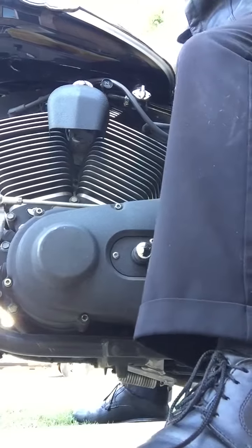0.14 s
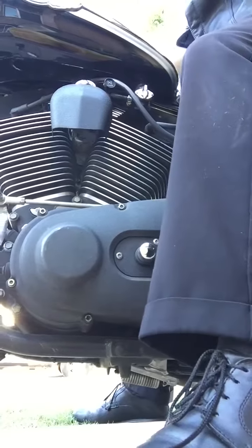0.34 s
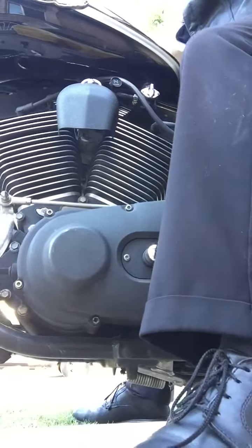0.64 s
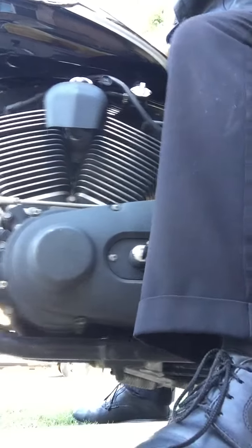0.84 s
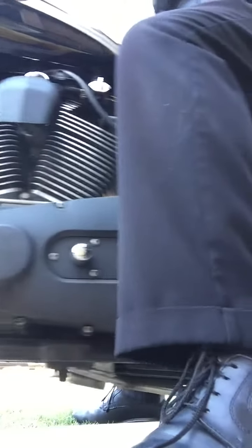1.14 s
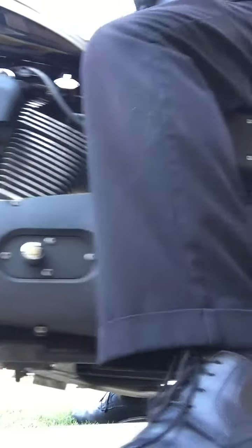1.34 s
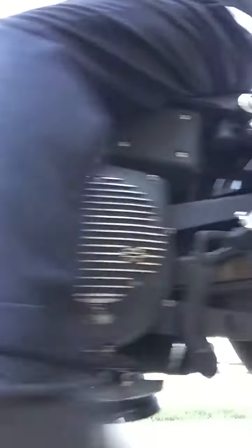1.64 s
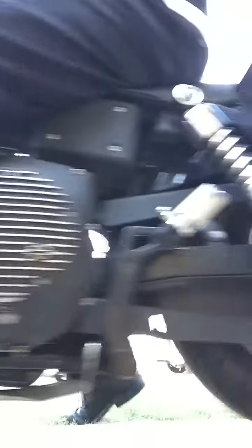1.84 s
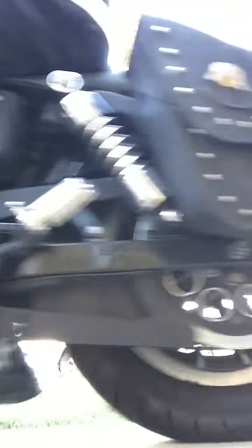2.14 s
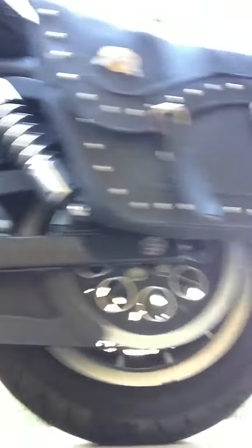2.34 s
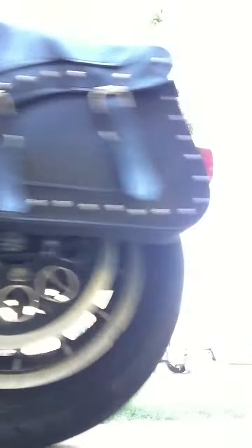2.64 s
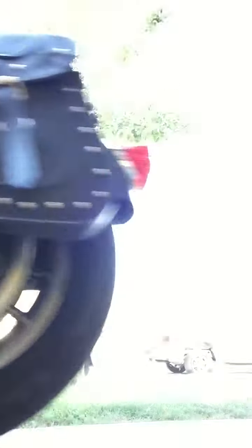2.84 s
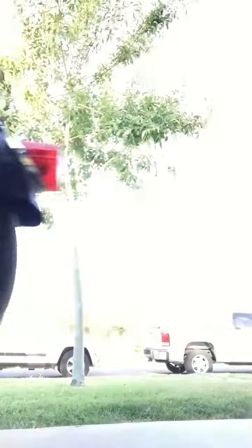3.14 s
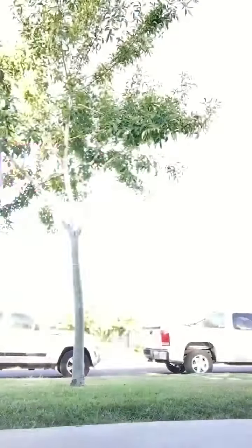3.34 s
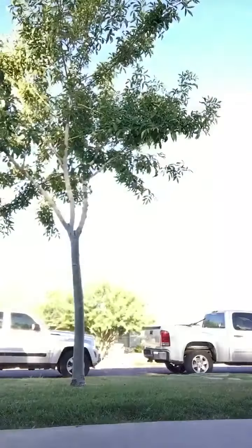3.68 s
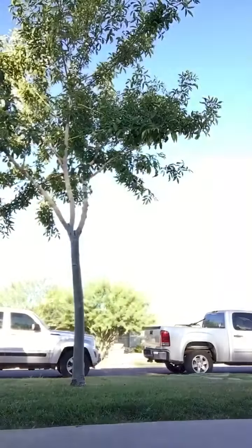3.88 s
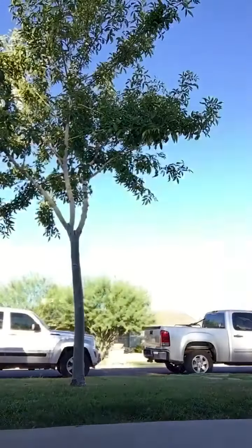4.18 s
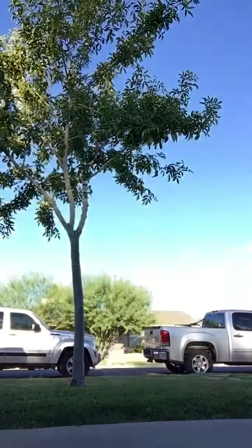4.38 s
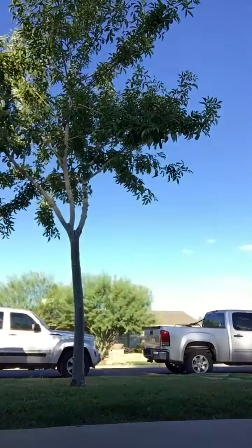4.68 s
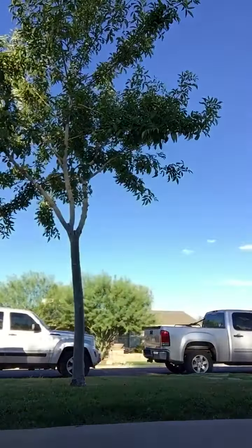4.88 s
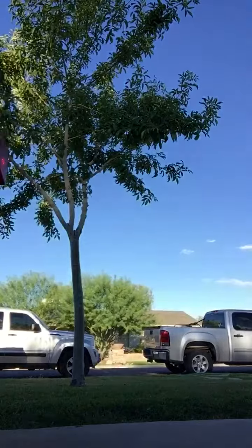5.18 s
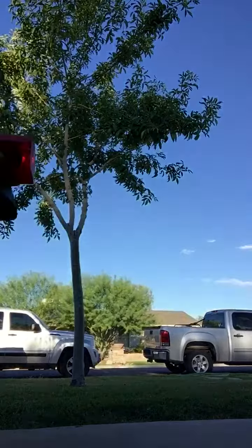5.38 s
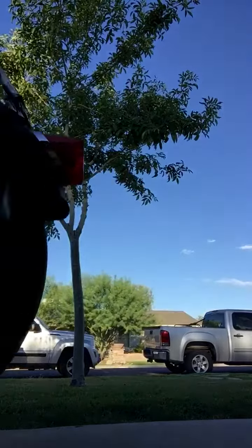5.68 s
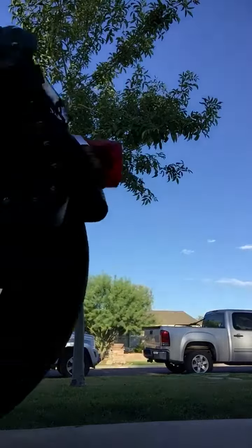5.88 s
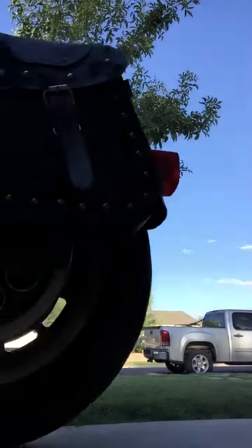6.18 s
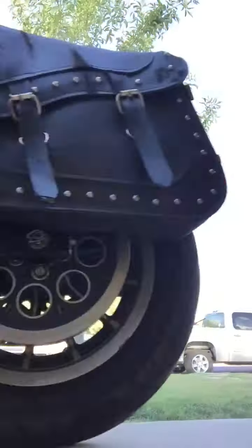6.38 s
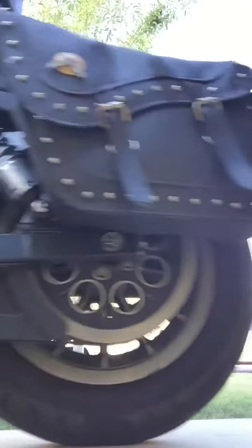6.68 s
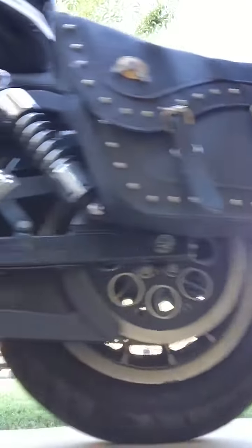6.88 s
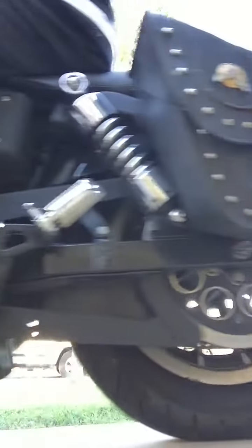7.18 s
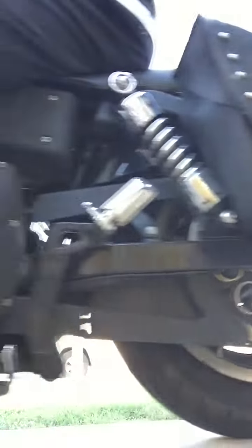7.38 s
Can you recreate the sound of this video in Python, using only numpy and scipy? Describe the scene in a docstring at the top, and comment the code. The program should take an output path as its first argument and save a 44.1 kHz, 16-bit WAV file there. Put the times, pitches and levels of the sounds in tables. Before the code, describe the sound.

For the first 0.7 seconds there is only a low street hush, a distant engine's wavering low drone and a faint switch click near 0.25. At 0.7 a steel knock starts a gritty, whining starter that labours, sinking in pitch and fading around 1.13 before grinding again; a harder clunk at 1.27 begins the second crank, higher and quicker. At 1.53 a heavy knock and sharp bangs mark the engine catching. It stumbles, booming and spitting, while a starter ratchet ticks until about 2.3. Throttle blips come at 2.6, 3.1, 4.1, 4.8, 5.1, 6.0, 6.55 and 7.1: abrupt raspy roars with deep uneven twin-cylinder pulses, then falling revs with crackling barks. The longest settling, just before 4.1, drops to a lumpy rumble; another lull precedes 6.0. Valve clatter and ringing metal sit faintly underneath. The close microphone overloads, and the sound ends still revving down around 7.5.

```python
"""On a street, close by a V-twin motorcycle: its starter grinds twice, then the engine catches and is blipped
again and again. Uneven pairs of firings excite the resonances of the exhaust pipe, rasp at its mouth, and
bark as each blip dies away, hard enough to overload the microphone. Gear meshing and ringing metal make
the starter, a ratchet ticks in its clutch, and coloured noise with one wavering tone makes the street,
where another engine idles quietly further off."""
import sys
import numpy as np
from scipy import signal
from scipy.fft import rfft, irfft, next_fast_len
from scipy.io import wavfile
from scipy.ndimage import uniform_filter1d, minimum_filter1d, map_coordinates

SR = 44100
rng = np.random.default_rng(int(sys.argv[2]) if len(sys.argv) > 2 else 0)


def store_wav(level_fs):
    """Save 16-bit WAV to argv[1]."""
    pcm = np.round(np.clip(np.atleast_2d(level_fs), -1, 1) * 32767)
    wavfile.write(sys.argv[1], SR, pcm.T.astype(np.int16))


N = 331632  # samples

# All levels are relative; each function sets the final balance.
# Engine speed as it stumbles into life: start_s, speed_cycles_per_s (four-stroke cycles)
CATCH_SPEED = [(1.53, 6.4), (1.7, 6.1), (1.9, 10.4), (2.1, 10), (2.3, 15.5), (2.5, 11.5), (2.62, 13)]
# Throttle blips: opens_s, shuts_s, first_bark_s, top_speed_cycles_per_s, coast_time_constant_s
BLIPS = [(2.6204, 2.8814, 2.9231, 30.0, .4532), (3.1059, 3.2589, 3.3027, 31.48, .5214),
         (4.0645, 4.425, 4.4512, 27.03, .4523), (4.8197, 5.0066, 5.0258, 24.26, .6034),
         (5.1441, 5.305, 5.3297, 25.78, .4321), (6.0145, 6.2948, 6.3321, 25.01, .4495),
         (6.5538, 6.7784, 6.7968, 25.49, .4591), (7.1123, 7.2502, 7.3069, 25.75, .4688)]
# Effort of each blip: opening_time_s, boom_db, crack_db (both under throttle), overrun_bark_db
EFFORT = [(0.017, -6.5, -8, -6.5), (0.085, -4, -4, -7), (0.097, -7.5, -15, -6.5), (.1, -7.5, -10, -7),
          (0.027, -8, -15.5, -4.5), (0.097, -7.5, -10, -2.5), (0.073, -7, -11, -2), (0.021, -2, -6.5, -1.5)]
# Single hard firings, as the mixture catches and near idle: start_s, crack_db, spit_db, boom_db
BANGS = [(1.5307, 1, -4, 1.5), (1.604, 2.5, -12, -2), (1.6875, -5, -24.5, -11), (1.7502, -14, -26.5, -11.5),
         (1.8332, -20, -12.5, -8), (1.8825, -23, -14.5, -2.5), (1.9337, -5.5, -18, -9),
         (2.171, -15, -17, -2.5), (2.2144, -6, -24, 1.5), (2.2437, -3.5, -23, -8), (2.582, -23, -18.5, -6),
         (4.006, -23, -47, -12.5), (4.05, -23, -33.5, -13), (5.7185, -38, -35.5, -6.5),
         (5.8911, -21.5, -43, -7), (5.9315, -21, -37, -18), (6.0432, -18.5, -24.5, -25)]
# Overrun barks, front then rear cylinder: level_db, fade_below_cycles_per_s, loss_db_per_cycle_per_s
OVERRUN = [(2, 20.99, 5.5), (-2, 26.3, 2)]
# Exhaust pipe resonances: centre_hz, width_hz, level_db
PIPE_MODES = [(64, 14.4, -6), (89, 19.7, 2), (157.6, 34, -1.5), (255.8, 43, 0.5), (342, 53, -7.5)]
# Orders of the engine cycle in the exhaust tone: order, level_db (at 17 cycles/s), rise_db_per_octave
EXHAUST_ORDERS = [(2, -16, 14), (3, -14, 4), (4, -19, 4), (5, -1, -1), (6, -11, -14), (7, -20, 14),
                  (8, -19, 17), (9, -20, 14), (10, -17, 11), (12, -19, 6), (14, -16, -3)]
# Exhaust gas noise spectrum: frequency_hz, density_db_per_hz
RASP_SPECTRUM = [(240, -26), (400, 7.5), (512, 0.5), (607, -1.5), (839, -0.5), (1250, -2.5), (1650, -8.5),
                 (2840, -11), (3160, -18), (4880, -20), (5600, -18), (9610, -22), (14100, -23.5),
                 (16000, -43)]
# Throaty gas flow spectrum: frequency_hz, density_db_per_hz
BELLOW_SPECTRUM = [(200, -20), (380, 3), (560, -6), (800, -2), (1200, -10.5), (2500, -34), (8000, -50)]
# Blast of a hard firing: frequency_hz, density_db_per_hz
BARK_SPECTRUM = [(100, 13), (300, 4), (600, 0.5), (1300, 3.5), (1700, -0.5), (3200, -1), (5000, -5),
                 (6000, -3), (9000, -12.5), (15000, -15.5)]
# Exhaust spitting: frequency_hz, density_db_per_hz
SPIT_SPECTRUM = [(3000, 4), (6500, -8.5), (8000, 5), (9500, 1), (12000, -6), (16000, -8)]
# Ground, wheel and saddlebag reflections: delay_s, level_db
REFLECTIONS = [(.0017, -20.5), (.0034, -17.5), (.0058, -16), (.0093, -17)]
# Resonances of pipe walls and cooling fins: centre_hz, width_hz, level_db
METAL_MODES = [(570.7, 19, 6), (806, 26, -5), (978, 7.2, -34), (1319, 9.5, -1.5), (1456, 7.3, -4.5),
               (2006, 43, -3.5), (2064, 16, 2), (2524, 23, 5), (3120, 67, -2), (3860, 10, -13),
               (5230, 180, -7), (7500, 620, -6)]
# Valve gear spectrum: frequency_hz, density_db_per_hz
CLATTER_SPECTRUM = [(200, -14), (420, 2.5), (700, -1), (1060, -1), (1500, -5.5), (2400, -9.5), (3100, -9.5),
                    (4750, -16.5), (9000, -17), (14500, -25), (16000, -33)]
# Valve gear, quieter while the microphone is behind the bike: time_s, level_db
VALVE_LEVEL = [(2.4, -35), (3.3, -44.5), (5.9, -39.5), (6.8, -41)]
# Starter motor: time_s, level_db
STARTER_LEVEL = [(0.68, -47), (0.708, -20), (0.716, -21), (0.726, -8), (0.772, -14.5), (1.056, -10.5),
                 (1.134, -29), (1.236, -10), (1.256, -16.5), (1.27, -19), (1.326, -13), (1.44, -9.5),
                 (1.47, -18.5), (1.506, -14.5), (1.53, 1)]
# Starter gears, slowed by each compression: time_s, mesh_hz
GEAR_MESH = [(.72, 740), (.8, 654.5), (.87, 681.5), (.93, 697), (1.0, 812), (1.04, 824.6), (1.1, 700),
             (1.2, 532.5), (1.26, 480), (1.3, 855), (1.34, 925), (1.39, 954), (1.45, 850), (1.53, 805)]
# Crankcase spectrum: frequency_hz, density_db_per_hz
CASE_SPECTRUM = [(88, -39), (150, -9), (240, -11.5), (309, -0.5), (391, -10), (675, -8.5), (730, -14),
                 (888, -2.5), (1390, -5), (4240, -16.5), (4950, -21.5), (9260, -28.5), (16000, -40)]
# Air pumped by the cranked pistons: time_s, pitch_hz, level_db
PISTON_PUMP = [(.9, 50, -65), (.99, 56.5, -30), (1.1, 69, -23.5), (1.2, 81, -26), (1.27, 59, -40),
               (1.35, 61, -33), (1.48, 77.4, -52)]
# Solenoid and pinion knocks: start_s, peak_db, ring_t60_s
KNOCKS = [(0.706, -16.5, 0.03), (0.725, -9.5, 0.076), (1.266, -0.5, 0.036), (1.275, -6.5, 0.17),
          (1.522, 13, .05)]
# Thud of those knocks: frequency_hz, density_db_per_hz
THUD_SPECTRUM = [(150, -28), (350, 6), (600, 7), (1000, -5), (2500, 4.5), (8000, -61)]
# Switch clicks: start_s, level_db
CLICKS = [(.247, -32), (.46, -64), (.595, -64)]
# Switch spectrum: frequency_hz, density_db_per_hz
SWITCH_SPECTRUM = [(300, -30), (900, -12), (1600, -18), (2100, -4), (2700, -17), (3800, -5), (5000, -22),
                   (6200, -13), (9400, -21), (16000, -30)]
# Starter clutch overrunning once the engine fires: time_s, ticks_per_s, level_db
CLUTCH_TICKS = [(1.54, 63, -20.5), (1.65, 52, -19), (1.78, 57, -21.5), (1.9, 79, -22), (2.0, 100, -28),
                (2.1, 80, -26.5), (2.24, 59, -22), (2.3, 61, -37)]
# Ratchet spectrum: frequency_hz, density_db_per_hz
RATCHET_SPECTRUM = [(530, -9.5), (900, -11), (1030, -9), (1150, -9), (1190, -14), (1600, -8), (1750, -16.5),
                    (2420, 1), (2760, -5.5), (4520, -4), (5410, -13), (8760, -15.5), (16000, -22)]
# Street hush spectrum: frequency_hz, density_db_per_hz
STREET_SPECTRUM = [(18, -56), (30, -31), (53, -30), (65, -7.5), (87, -3.5), (110, -11.5), (171, -13.5),
                   (304, -21.5), (437, -33), (1240, -38), (2560, -58), (3780, -59), (15000, -71)]

IDLE_RATE, RUN_UP_BEND = 10, 1.15  # cycles/s that coasting tends to; exponent that bends the run-up
# Rear cylinder after the front one; its barks start before the front one's (cycles)
REAR_LAG, REAR_BARK_LEAD = 315 / 720, .6
# Throttle starts to open early, is fully shut late, time to close
THROTTLE_LEAD_S, THROTTLE_LAG_S, THROTTLE_EASE_S = 0.015, 0.039, .1
SHUT_CRACK_DB, SCATTER_DB = -18, 2  # change of cracks as the throttle shuts; scatter between firings
# Boom when coasting; below the knee (cycles/s) it loses dB per cycle/s, down to idle
COAST_BOOM_DB, COAST_KNEE_RATE, COAST_LOSS_DB, IDLE_BOOM_DB = -10.5, 19.43, 1.75, -17
BANG_SWELL_S, BANG_T60_S = 0.0096, 0.35  # boom of a single hard firing
RASP_DB, RASP_THROTTLE_DB = -7.5, 6  # gas noise relative to a crack; extra under throttle
# Spit of a throttle opened at low speed; loss per cycle/s above idle; change with the throttle shut
SPIT_DB, SPIT_FADE_DB, SPIT_SHUT_DB = -21, 0.6, -28
# Turbulence behind each slug; burning in the pipe, below this many cycles/s
SWIRL_DB, AFTERBURN_DB, AFTERBURN_BELOW_RATE = -27, -29.5, 18.2
# Deep resonances at idle, their change at speed; dB of upper resonances per dB of boom
DEEP_DB, DEEP_FAST_DB, UPPER_SHARE = 3.5, -11, 0.25
# Exhaust tone offset, its unevenness, its change under throttle
GROWL_DB, GROWL_LUMPS_DB, GROWL_THROTTLE_DB = -7, 3.5, 0.5
BELLOW_DB = -12.5  # throaty flow relative to the boom level
# Below this level the labouring starter loses its treble, dB per dB
STARTER_DULL_DB, STARTER_BRIGHT_SHARE = -14, 0.57
TOP_HZ = 15900  # upper edge of the band


def engine():
    """Pulsed excitation: paired firings boom in the pipe and rasp at its mouth over the valve clatter."""
    speed, openings = revs(), throttles()
    throttle = openings.max(axis=0)
    boom_db = load(speed, openings)
    running = np.arange(N) / SR >= CATCH_SPEED[0][0]  # silent until the mixture catches
    cycles = np.cumsum(speed * running) / SR
    fired, crack_db = firings(cycles, speed, throttle)
    spit_db = SPIT_DB - SPIT_FADE_DB * (at(speed, fired) - IDLE_RATE)
    spit_db = spit_db + SPIT_SHUT_DB * (1 - at(throttle, fired))
    bang_s, bang_db, bang_spit_db, _ = np.transpose(BANGS)

    # before the first blip the cylinders only puff between the bangs
    puffs = np.r_[passes(cycles), passes(cycles - REAR_LAG)]
    slugs = np.r_[puffs[puffs < BLIPS[0][0]], fired, bang_s]
    low = boom(slugs, 2.5 * at(wobble(120), slugs), speed, boom_db)
    gas = bursts(fired, amp(crack_db), attack=0.00013, t60=0.053, tail_db=-7.5, tail_t60=0.23)
    rasp = noise(RASP_SPECTRUM) * amp(RASP_DB + RASP_THROTTLE_DB * throttle) * gas
    ringing = metal(rasp + valve_gear(cycles), direct_db=-3, ring_db=-3)
    tone = growl(speed, boom_db, throttle)
    gusts = bellow(fired, boom_db, throttle)
    hard = barks(np.r_[fired, bang_s], np.r_[crack_db, bang_db], np.r_[spit_db, bang_spit_db])
    return (low + ringing) * running + tone + gusts + hard


def revs():
    """Rotational inertia: each blip runs the engine up, then it decays exponentially towards idle (cycles/s)."""
    t = np.arange(N) / SR
    speed, = curves(CATCH_SPEED)
    for opens, shuts, _, top, coast in BLIPS:
        left = np.clip((shuts - t) / (shuts - opens), 0, 1)
        rise = top - (top - at(speed, opens)) * left ** RUN_UP_BEND
        fall = IDLE_RATE + (top - IDLE_RATE) * np.exp(-np.maximum(t - shuts, 0) / coast)
        speed = np.where(t < opens, speed, np.where(t < shuts, rise, fall))
    return speed


def throttles():
    """Flow control: throttle opening 0-1, one curve per blip, as it opens, holds and eases off."""
    t = np.arange(N) / SR
    curves_by_blip = []
    for (opens, shuts, *_), (travel, *_) in zip(BLIPS, EFFORT):
        opening = np.clip((t - opens + THROTTLE_LEAD_S) / travel, 0, 1)
        closing = np.clip((shuts + THROTTLE_LAG_S - t) / THROTTLE_EASE_S, 0, 1)
        curves_by_blip.append(opening * closing)
    return np.array(curves_by_blip)


def load(speed, openings):
    """Power summation: boom in dB follows coasting speed, moves with the throttle and leaps with each bang."""
    t = np.arange(N) / SR
    db = COAST_BOOM_DB - COAST_LOSS_DB * np.maximum(COAST_KNEE_RATE - speed, 0)
    db = np.maximum(db, IDLE_BOOM_DB)
    for opening, (_, boom_db, *_) in zip(openings, EFFORT):
        db = db + opening * (boom_db - db)
    bang_s, _, _, bang_db = np.transpose(BANGS)
    swell = (1 - np.exp(-t[:SR] / BANG_SWELL_S)) * amp(-60 * t[:SR] / BANG_T60_S)
    bang_power = signal.fftconvolve(kicks(bang_s, amp(bang_db) ** 2), swell ** 2)[:N]
    return 10 * np.log10(amp(db) ** 2 + np.abs(bang_power))


def firings(cycles, speed, throttle):
    """Crank timing: times and crack dB of uneven pairs under throttle, a short lull, then overrun barks."""
    def strokes(start, end, offset):
        turns = np.arange(at(cycles, start) + offset, at(cycles, end), 1)
        return np.interp(turns, cycles, np.arange(N) / SR)

    times, levels = [], []
    ends = [blip[0] for blip in BLIPS[1:]] + [N / SR]
    for (opens, shuts, barks_from, *_), (*_, crack_db, bark_db), end in zip(BLIPS, EFFORT, ends):
        for offset in (0, REAR_LAG):
            driven = strokes(opens, shuts, offset)
            times.append(driven)
            levels.append(crack_db + SHUT_CRACK_DB * (1 - at(throttle, driven)))
        for offset, (db, knee, loss_db) in zip((0, -REAR_BARK_LEAD), OVERRUN):
            coasting = strokes(barks_from, end, offset)
            times.append(coasting)
            levels.append(bark_db + db - loss_db * np.maximum(knee - at(speed, coasting), 0))
    times = np.concatenate(times)
    return times, np.concatenate(levels) + SCATTER_DB * at(wobble(120), times)


def boom(times, size_db, speed, boom_db):
    """Pipe resonance: each slug of gas, a clean push followed by turbulence, rings the exhaust."""
    swirl = bursts(times, np.ones(len(times)), attack=0.0015, t60=0.066, tail_db=-9, tail_t60=0.14)
    swirl = swirl * rng.standard_normal(N)
    # slow, rich firings burn on in the pipe and link up
    afterburn = np.clip((AFTERBURN_BELOW_RATE - speed) / 6, 0, 1) * rng.standard_normal(N)
    ring = pipe(kicks(times, amp(size_db)) + amp(SWIRL_DB) * swirl + amp(AFTERBURN_DB) * afterburn)

    # at idle the deep resonances lead, at speed and under load the upper ones
    deep = filtered(ring, lambda f: 1 / (1 + (f / 125) ** 6))
    upper = ring - deep
    fast = np.clip((speed - 17) / 10, 0, 1)
    ring = deep * amp(DEEP_DB + DEEP_FAST_DB * fast) + upper * amp(UPPER_SHARE * (boom_db - COAST_BOOM_DB))
    # level the short-term power, then impose an expanded boom curve
    power = np.abs(uniform_filter1d(ring ** 2, size=3000)) + 1e-4 * np.mean(ring ** 2)
    return ring / np.sqrt(power) * amp(1.374 * boom_db)


def pipe(x):
    """Modal filtering: the exhaust rings in its low resonances; its mouth radiates little deep bass."""
    def response(f):
        mouth = shape([(22, -12), (48, 0)], f)
        return resonances(PIPE_MODES, f) / (1 + 1j * f / 420) ** 2 * mouth

    return filtered(x, response)


def growl(speed, boom_db, throttle):
    """Harmonic orders: the fifth of the engine cycle sings; most orders around it grow with speed."""
    cycle = 2 * np.pi * np.cumsum(speed * (1 + .012 * wobble(25))) / SR
    octaves = np.log2(speed / 17)
    tone = np.zeros(N)
    for order, db, rise in EXHAUST_ORDERS:
        gain = amp(db + rise * octaves + 2 * wobble(16))
        tone += gain * np.sin(order * cycle + rng.uniform(0, 2 * np.pi))
    # the pipe passes little below its main resonance
    tone = filtered(tone, lambda hz: shape([(65, -11.5), (85, -0.5)], hz))
    steady, = curves([(2.3, 0), (2.4, 1)])  # enters once the engine runs
    level_db = 0.86 * boom_db + GROWL_DB + GROWL_THROTTLE_DB * throttle + GROWL_LUMPS_DB * wobble(45)
    return amp(level_db) * steady * tone


def bellow(times, boom_db, throttle):
    """Flow noise: with the throttle open each firing pushes a throaty gust through the pipe."""
    gusts = bursts(times, np.ones(len(times)), attack=0.00079, t60=0.057, tail_db=-12, tail_t60=0.11)
    return echoed(noise(BELLOW_SPECTRUM) * gusts * throttle * amp(boom_db + BELLOW_DB))


def barks(times, level_db, spit_db):
    """Impulsive radiation: a hard firing gives a bright crack, a longer duller blast and some spit."""
    blast_env = bursts(times, amp(level_db + 0.5), attack=0.0012, t60=0.025, tail_db=-12.5, tail_t60=0.12)
    blast = filtered(noise(BARK_SPECTRUM) * blast_env, lambda f: 1 / (1 + 1j * f / 5000))
    crack = noise(SPIT_SPECTRUM) * .5 + noise(RASP_SPECTRUM)
    crack = crack * bursts(times, amp(level_db + 1), attack=0.0011, t60=0.014, tail_db=-29, tail_t60=0.057)
    spit_env = bursts(times, amp(spit_db + 16.0), attack=0.00072, t60=0.02, tail_db=-24.5, tail_t60=0.15)
    spit = noise(SPIT_SPECTRUM) * spit_env
    return echoed(metal(blast, direct_db=4, ring_db=1.5) + crack + spit)


def echoed(x):
    """Superposition: a sound with its delayed reflections from the surfaces close by."""
    def response(f):
        return 1 + sum(amp(db) * np.exp(-2j * np.pi * f * s) for s, db in REFLECTIONS)

    return filtered(x, response)


def valve_gear(cycles):
    """Repeated impact: loose tappets strike about four times a cycle."""
    taps = passes(4 * cycles + .2 * wobble(60))
    tap_db = 3 * at(wobble(200), taps)
    hits = bursts(taps, amp(tap_db), attack=0.00082, t60=0.035, tail_db=8.5, tail_t60=0.087)
    return noise(CLATTER_SPECTRUM) * amp(curves(VALVE_LEVEL)[0]) * hits


def metal(x, direct_db, ring_db):
    """Structural resonance: part of a sound goes straight out, part rings in the engine's metal."""
    ring = filtered(x, lambda f: 1j * resonances(METAL_MODES, f))
    return amp(direct_db) * x + amp(ring_db) * ring


def starter():
    """Gear-mesh modulation: teeth whine and grind in the crankcase while the pistons pump air."""
    level_db, = curves(STARTER_LEVEL)
    mesh_hz, = curves(GEAR_MESH)
    phase = 2 * np.pi * np.cumsum(mesh_hz * (1 + .007 * wobble(90))) / SR
    teeth = sum(np.sin(k * phase) * amp(3.5 * wobble(25)) for k in range(1, 7))
    # uneven teeth throw sidebands at the shaft rate, a ninth of the mesh rate, and its multiples
    shaft = phase / 9
    teeth = teeth * (1 + .6 * np.sin(shaft) + .5 * np.sin(2 * shaft) + .8 * np.sin(4 * shaft))
    whine = unit(filtered(teeth, lambda hz: shape(CASE_SPECTRUM, hz)))
    grind = unit(metal(noise(CASE_SPECTRUM), direct_db=4, ring_db=3.5)) * amp(2.2 * wobble(250))
    gears = .68 * whine + .73 * grind

    dull = filtered(gears, lambda hz: 1 / (1 + (hz / 2500) ** 4))
    treble_db = STARTER_BRIGHT_SHARE * np.minimum(level_db - STARTER_DULL_DB, 0)
    gears = dull + (gears - dull) * amp(treble_db)
    pump_hz, pump_db = curves(PISTON_PUMP)
    pump = amp(pump_db) * np.sin(2 * np.pi * np.cumsum(pump_hz) / SR) * during(PISTON_PUMP)
    return gears * amp(level_db - 8.5) * during(STARTER_LEVEL) + pump


def knocks():
    """Impact and decay: the switch clicks; steel contacts thud and ring briefly in the crankcase."""
    t = np.arange(N) / SR
    blows = sum(amp(db - 12.5 - 60 * np.abs(t - s) / t60) * (t >= s) for s, db, t60 in KNOCKS)
    click_s, click_db = np.transpose(CLICKS)
    click_env = bursts(click_s, amp(click_db), attack=0.00052, t60=0.031, tail_db=-11.0, tail_t60=.17)
    clicks = noise(SWITCH_SPECTRUM) * click_env
    body = noise(CASE_SPECTRUM) + amp(-2.5) * noise(RATCHET_SPECTRUM) + amp(4) * noise(THUD_SPECTRUM)
    return metal(blows * body + clicks, direct_db=4.5, ring_db=-15)


def clutch():
    """Ratchet impacts: the overrunning starter clutch ticks until the button is let go."""
    rate, db = curves(CLUTCH_TICKS)
    ticks = passes(np.cumsum(rate * (1 + 0.21 * wobble(60))) / SR)
    sizes = amp(9.5 + 2.6 * rng.standard_normal(len(ticks)))
    hits = bursts(ticks, sizes, attack=0.00046, t60=.014, tail_db=-4, tail_t60=0.053)
    return noise(RATCHET_SPECTRUM) * hits * amp(db) * during(CLUTCH_TICKS)


def street():
    """Ambient noise plus a tone: outdoor hush with the wavering drone of a distant idling engine."""
    phase = 2 * np.pi * np.cumsum(85 + 3 * wobble(4.9)) / SR
    drone = amp(-39.5 + 2.6 * wobble(14.0)) * np.sin(phase)
    return amp(-38.5) * noise(STREET_SPECTRUM) + drone


def amp(db):
    """Logarithmic level: decibels to gain."""
    return 10 ** (np.asarray(db) / 20)


def unit(x):
    """Power normalisation: scale to rms 1."""
    return x / np.sqrt(np.mean(x ** 2) + 1e-20)


def curves(rows):
    """Linear interpolation: one value per sample for each column after the time."""
    s, *cols = np.transpose(rows)
    return [np.interp(np.arange(N) / SR, s, c) for c in cols]


def at(curve, times):
    """Sampling: a curve's values at given times."""
    return np.interp(times, np.arange(N) / SR, curve)


def during(rows):
    """Gating: 1 from the first to the last time of a table, with soft edges."""
    t = np.arange(N) / SR
    inside = (t > rows[0][0]) & (t < rows[-1][0])
    return uniform_filter1d(1. * inside, size=200)


def wobble(rate):
    """Band-limited fluctuation: a smooth random curve, rate knots a second."""
    knots = rng.standard_normal(int(N * rate / SR) + 4)
    return map_coordinates(knots, [np.arange(N) * rate / SR], order=2)


def filtered(x, response):
    """Linear filtering: the spectrum of x times a complex response of frequency."""
    m = next_fast_len(N + SR // 2)
    return irfft(rfft(x, m) * response(np.fft.rfftfreq(m, 1 / SR)), m)[:N]


def shape(points, hz):
    """Spectral envelope: gain of (Hz, dB) points on a log axis."""
    f, db = np.transpose(points)
    return amp(np.interp(np.log(hz + 1), np.log(f + 1), db))


def noise(points):
    """Spectral shaping: coloured noise of rms 1."""
    return unit(filtered(rng.standard_normal(N), lambda hz: shape(points, hz)))


def resonances(modes, f):
    """Modal superposition: response of (Hz, width Hz, dB) modes with alternating signs."""
    total = 0
    for k, (centre, width, db) in enumerate(modes):
        damping = 1j * f * width
        total = total + (-1) ** k * amp(db) * damping / (centre * centre - f * f + damping)
    return total


def kicks(times, sizes):
    """Impulse excitation: one impulse per time."""
    return np.bincount(np.clip(np.round(times * SR).astype(int), 0, N), sizes, N + 1)[:N]


def bursts(times, sizes, attack, t60, tail_db, tail_t60):
    """Two-rate decay: burst powers add, each with a quick fall and a slower tail."""
    t = np.arange(SR // 4) / SR
    decay = amp(-60 * t / t60) ** 2 + amp(tail_db - 60 * t / tail_t60) ** 2
    power = (1 - np.exp(-t / attack)) ** 2 * decay
    return np.sqrt(np.abs(signal.fftconvolve(kicks(times, sizes ** 2), power)[:N]))


def passes(turns):
    """Phase counting: times at which a count of turns passes whole numbers."""
    return np.flatnonzero(np.diff(np.floor(turns)) > 0) / SR


def scene():
    """Superposition of all sources at one microphone."""
    return (engine() + starter() + knocks() + clutch() + street())[None]


def record(dry):
    """Saturation: a fast limiter holds the peaks, the rest is rounded off, and the band ends steeply."""
    ceiling, top, knee = 1.0, .76, 5
    needed = np.minimum(1, ceiling / (np.abs(dry[0]) + 1e-6))
    held = dry[0] * uniform_filter1d(minimum_filter1d(needed, size=130), size=130)
    soft = held / (1 + np.abs(held / top) ** knee) ** (1 / knee)
    return filtered(soft, lambda hz: 1 / (1 + (hz / TOP_HZ) ** 160))[None]


dry = scene()
out = record(dry)
store_wav(out)
```